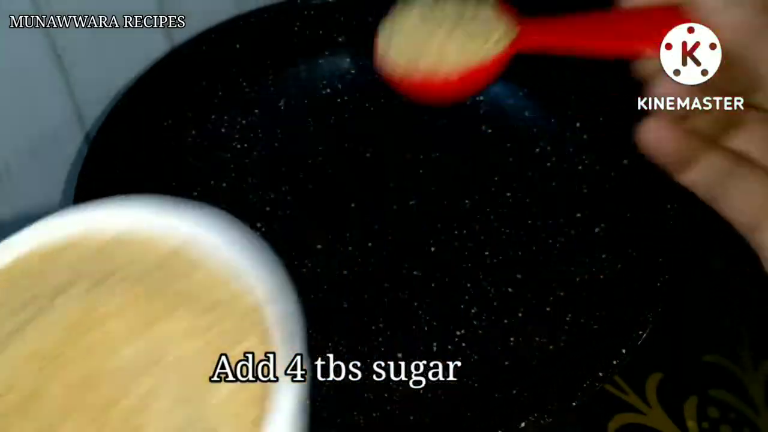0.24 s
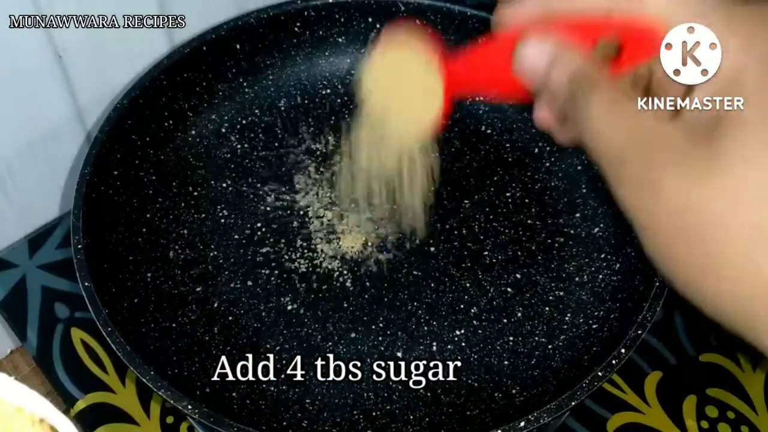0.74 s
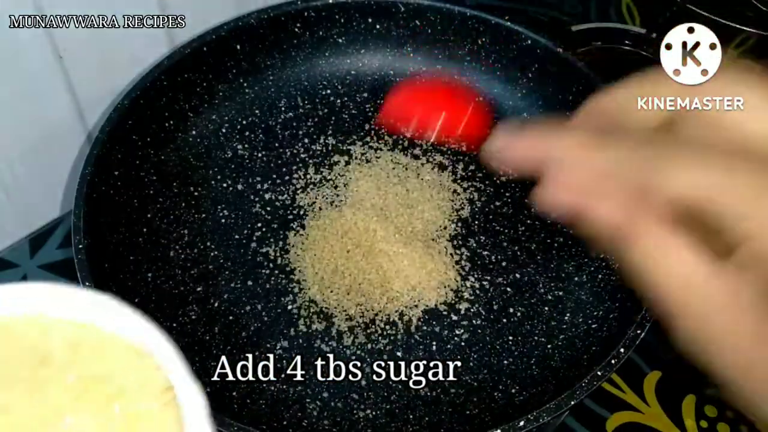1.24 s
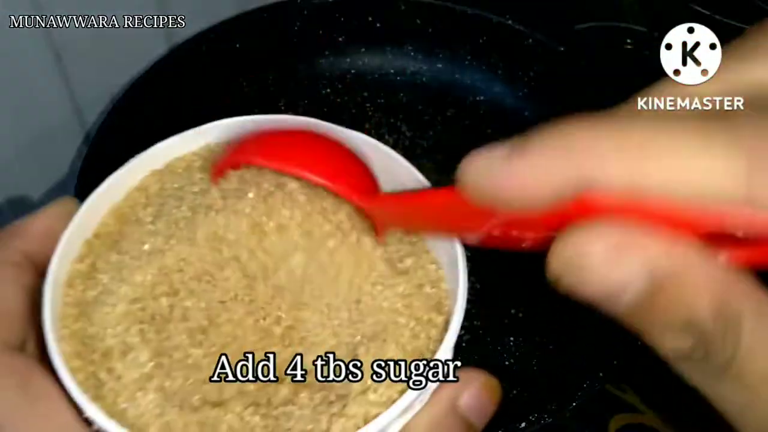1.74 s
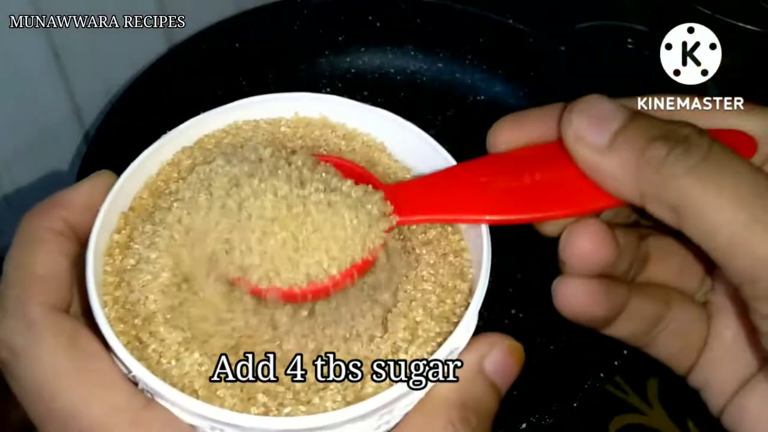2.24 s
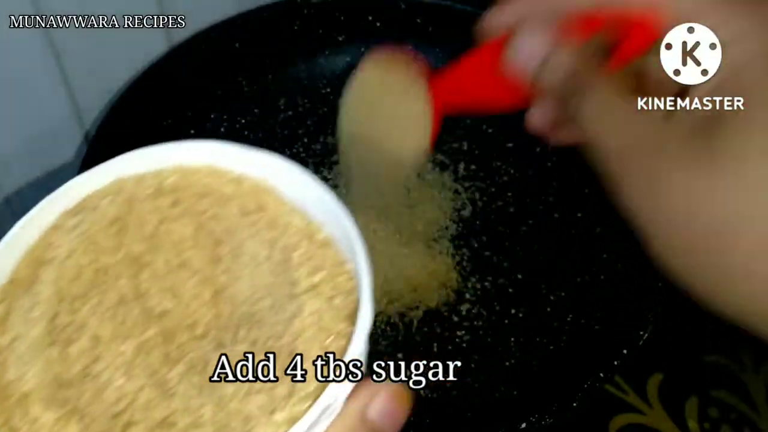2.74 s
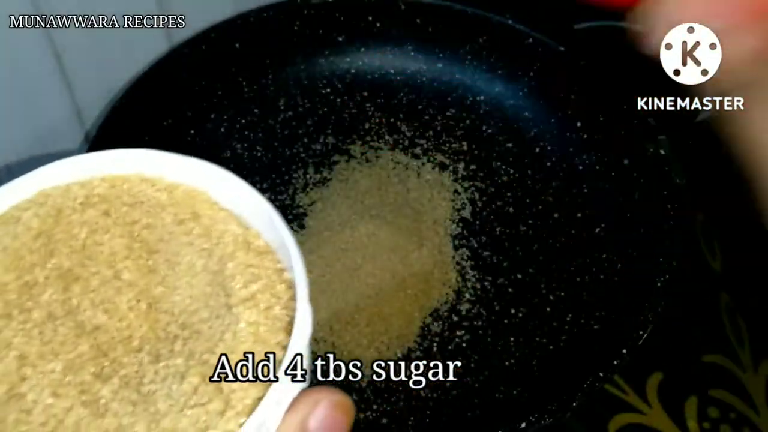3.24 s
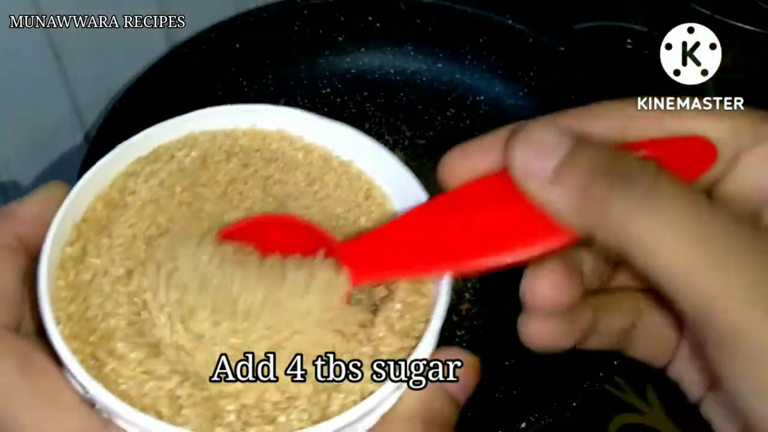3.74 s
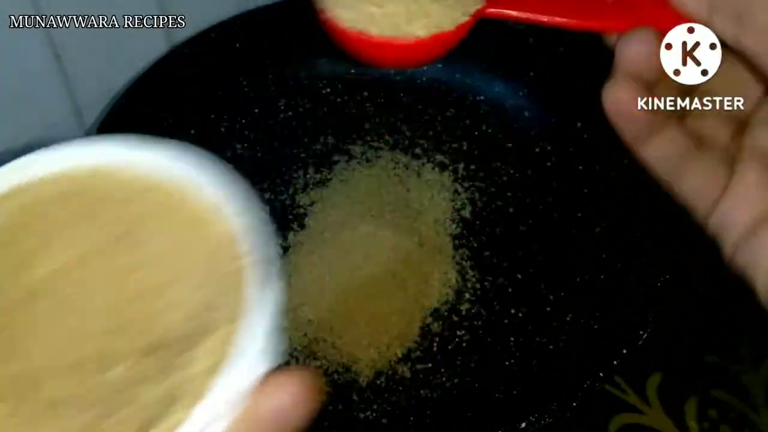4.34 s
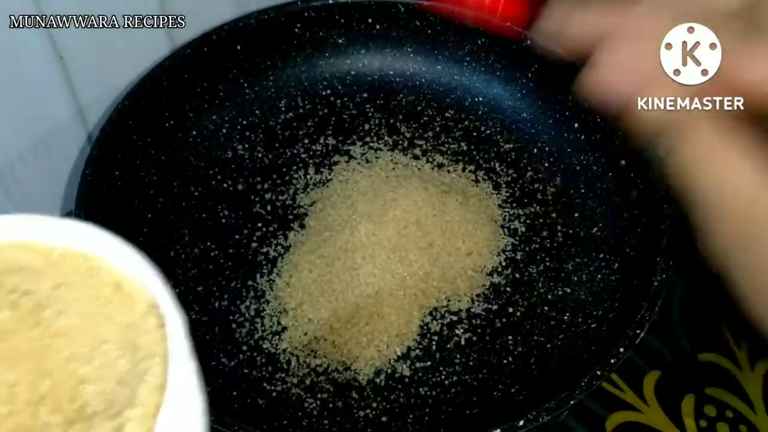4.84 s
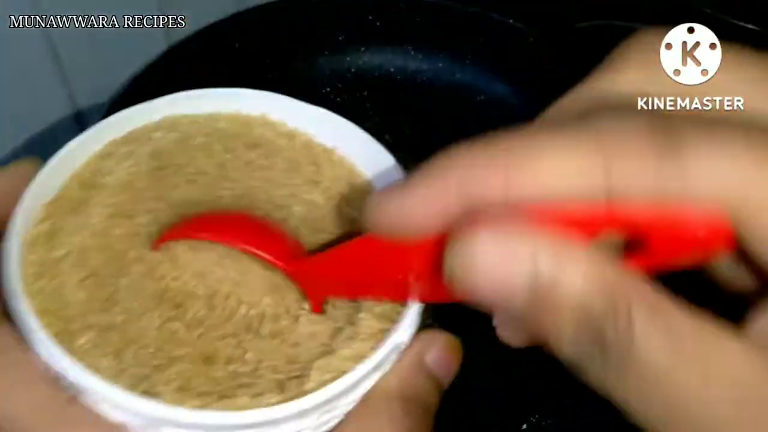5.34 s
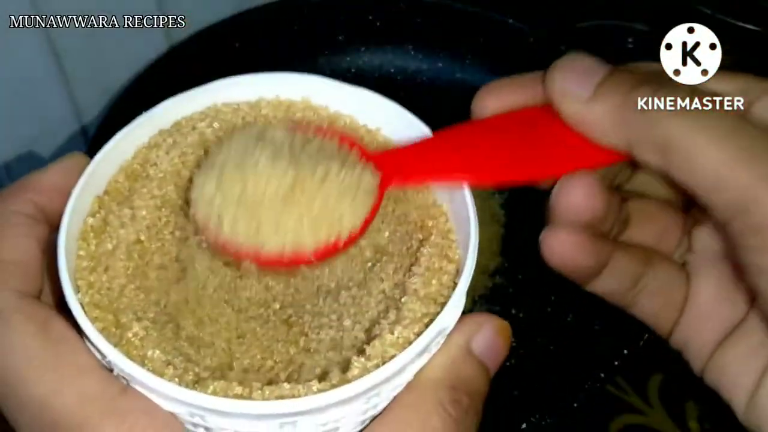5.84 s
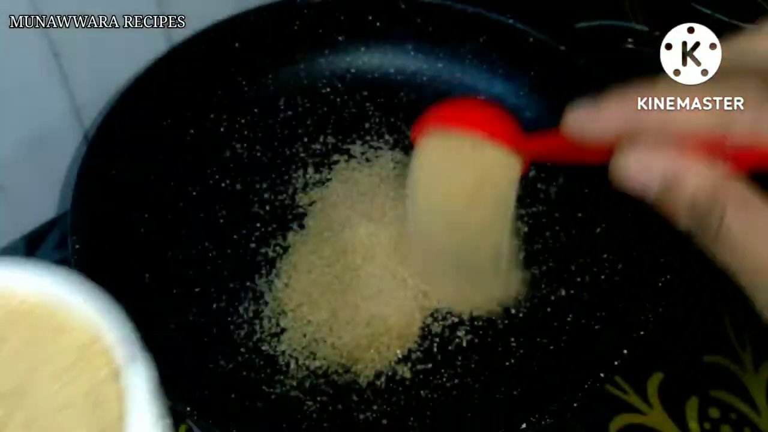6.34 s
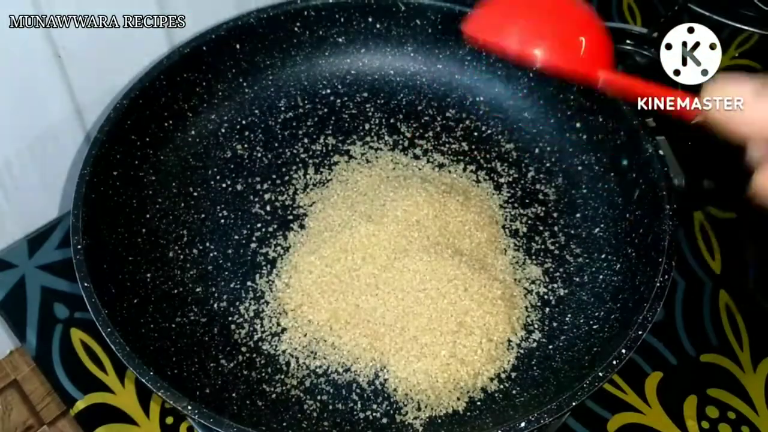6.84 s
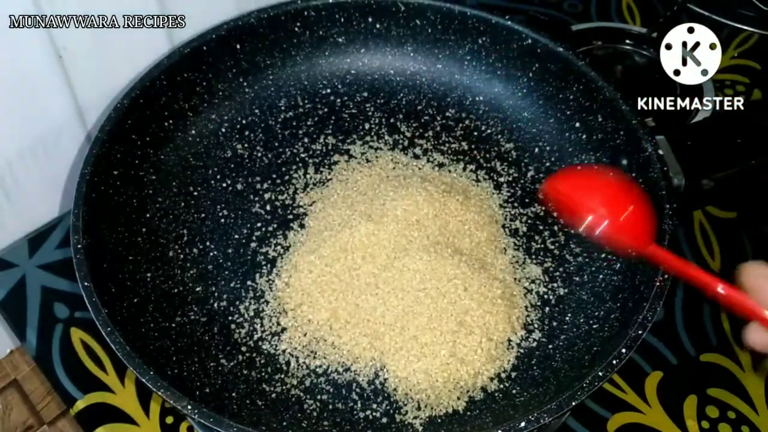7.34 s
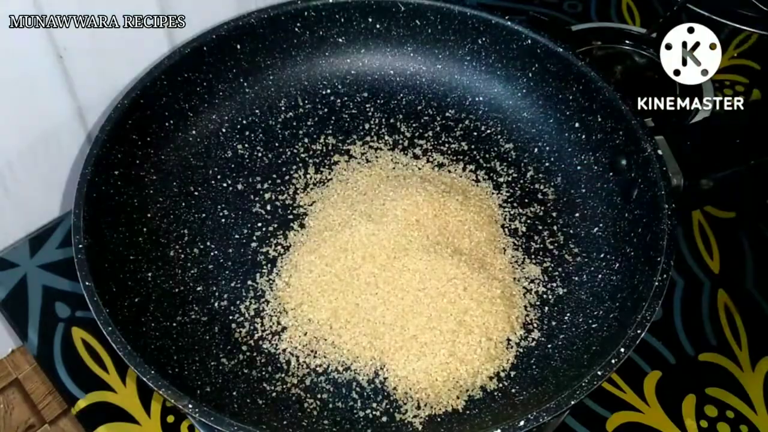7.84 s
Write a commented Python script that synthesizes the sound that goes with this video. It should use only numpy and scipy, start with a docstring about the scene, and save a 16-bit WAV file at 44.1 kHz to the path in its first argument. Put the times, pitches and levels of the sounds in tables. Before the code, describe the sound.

Close to a phone in a small hard-walled kitchen, dry crystals sprinkle onto a coated pan with a thin metallic shimmer, then patter on sugar. A spoon digs crunchily in a plastic bowl, with clumps falling in crisp bursts. Later come quiet gaps, isolated taps and short spills. Two loud, short-ringing knocks on the rim and a low rattle finish it, over distant rumble and drone.

```python
"""Coarse sugar is spooned from a plastic bowl into a coated metal pan in a small kitchen, close to a phone.
Over a low outside rumble the spoon rubs, then crystals (random impacts) patter on the ringing pan until a heap
damps it at about 0.9 s. The stream and its crumbling clumps (noise bursts) run on to about 3.3 s; up to 6.3 s
come taps, rubs and single slides. At 7.2 and 7.4 s the spoon raps the rim (noise cracks, ringing modes) and
the pan rocks on its stand; a faint tap, slide and rub end it."""
import sys
import numpy as np
from scipy import signal
from scipy.fft import rfft, irfft, next_fast_len
from scipy.io import wavfile
from scipy.ndimage import uniform_filter1d

SR = 44100
rng = np.random.default_rng(int(sys.argv[2]) if len(sys.argv) > 2 else 0)


def master_out(mix):
    """Clip the mix to full scale and print it as 16-bit PCM to the path in sys.argv[1]."""
    frames = np.transpose(np.atleast_2d(mix))
    ceiling = np.clip(frames, -1, 1)
    pcm = np.round(ceiling * 32767).astype(np.int16)
    wavfile.write(sys.argv[1], SR, pcm)


def nominal_scale(level):
    """Amplitude ratio for a level in decibels (scalar or array-like)."""
    x = np.asarray(level, float) / 20
    return 10 ** x


N = 356187

# sugar kept moving through the first pour and scoop: time_s, flow_db, dug_in_0_to_1
STREAM = [(0.0, -85.5, 1), (0.37, -88.5, 0.5), (0.46, -77.5, 0.5), (0.58, -63.5, 0.36), (0.76, -51.5, 0.3),
          (0.94, -62.5, 0.83), (1.22, -61, 0.82), (1.47, -60, 0.72), (1.69, -57, 0.77), (1.86, -61, 0.91),
          (2.05, -69, 0.88), (2.23, -71, 0.1), (2.34, -66.5, 0.37), (2.49, -74, 0.6), (2.77, -60.5, 0.38),
          (3.02, -68.5, 0.14), (3.2, -70.5, 0), (3.3, -67, 0.1), (3.36, -67.5, 0.75), (3.85, -80, 0.43),
          (4.4, -87.5, 0.6), (5.06, -89.5, 0.66), (6.2, -90.5, .8), (7.2, -100, 0.84)]
# single slides of a spoonful: start_s, peak_db, dug_in_0_to_1, rise_s, run_out_s
SLIDES = [(3.42, -53.5, 0.9, 0.1, 0.49), (4.498, -60, 0.02, 0.019, 0.35), (4.659, -78, 0.74, 0.018, 0.38),
          (5.248, -55.5, 0.9, 0.024, 0.45), (6.298, -56.5, 0, 0.018, 0.38), (8.0, -78, 0.15, .02, 0.33)]
RUN_OUT_POWER = 1.65  # over 1: a slide holds, then ends ever faster
# colour of crystal patter: freq_hz, level_db
PATTER_COLOUR = [(2500, -67.5), (4500, -8), (6000, -3), (8000, 3.5), (10000, -5), (12000, -21.5),
                 (14000, -47.5)]
# colour of fine grains: freq_hz, level_db
FINES_COLOUR = [(8000, -8.5), (11000, -8.5), (13000, -0.5), (15300, 1), (15800, -45.5)]
# colour of the spoon crunching through sugar: freq_hz, level_db
CRUNCH_COLOUR = [(1200, -27.5), (2000, -3.5), (3000, -2.5), (4500, -6.5), (6500, -22.5)]
# hollow colour of the cup: freq_hz, level_db
CUP_COLOUR = [(400, -28.5), (800, -15), (1100, -2.5), (1600, -5.5), (2500, -27)]
FINES_DB, CRUNCH_DB, CUP_DB = -8, -22, -29.5  # re the flow, spoon on the surface
CRUNCH_DUG_DB, CUP_DUG_DB = 20.5, 26  # gained when the spoon is dug in fully
GRAIN_PATCH_DB = 3

# modes of the thin pan base: freq_hz
BASE_HZ = [2169, 2455, 3413, 3957, 4425, 5001, 5900, 6013, 6681, 6977, 7154, 7660, 7784, 7935, 8312, 8597,
           8823, 9103, 9884, 10497, 11402, 12672, 13657, 14400]
# the same modes in order: width_hz, level_db
BASE_MODES = [(14, -1), (25, -14), (20, -11), (25, -14), (30, -13), (30, -10), (30, -9), (30, -8), (40, -7),
              (40, -5), (40, -4), (40, 0), (40, 0), (40, 0), (50, -6), (50, -7), (50, -3), (60, -9),
              (60, -11), (60, -14), (70, -13), (70, -15), (80, -18), (80, -16)]
BARE_DB, HEAP_S, HEAP_DB_PER_S = 3.5, 0.92, 145  # bare base re the flow; when and how fast the heap damps it

# clumps and single crystals landing: start_s, peak_db, centre_hz, first_tick_re_spray_db
CLUMPS = [(0.0825, -59.5, 8700, 13.5), (0.399, -42.5, 7100, 6.5), (0.4477, -47, 8150, 11),
          (0.478, -62, 7800, 12), (0.5109, -49, 8900, 11.5), (0.5688, -45, 8500, 8),
          (0.6085, -37.5, 8000, 3), (0.7594, -34, 7800, 5), (1.1892, -31.5, 7400, -5),
          (1.266, -28, 7140, -2), (1.334, -28, 7600, 3.5), (1.4178, -32, 4270, 4), (1.4658, -30.5, 4280, 4),
          (1.513, -30.5, 6840, 5.5), (1.5732, -21, 6000, -5), (1.5908, -16, 7240, -3),
          (1.769, -31.5, 7900, 5), (2.0712, -36, 8400, 2.5), (2.1276, -39, 9800, 2),
          (2.149, -50, 8200, -11), (2.2588, -30.5, 7350, -13), (2.346, -39, 8850, -1),
          (2.3562, -36, 8000, 4), (2.417, -38, 10100, 4), (2.44, -44.5, 9300, 6), (2.5277, -43.5, 7500, 10),
          (2.5454, -34, 7700, 1), (2.611, -43, 9000, 5), (2.6689, -30.5, 7900, 3.5),
          (2.735, -45.5, 7900, -1), (2.7877, -26.5, 9600, -2), (3.318, -37, 7100, 4.5),
          (4.513, -40, 9670, -1), (4.6683, -50, 7500, -4), (4.768, -63.5, 2500, 11),
          (5.756, -60.5, 2840, 7.5), (5.915, -46, 5300, -5), (6.144, -58, 9200, -11),
          (6.3116, -48, 7920, 4), (6.646, -66.5, 13200, -3), (6.766, -57.5, 10130, -2),
          (7.7208, -64, 7330, 0.5), (8.0024, -54, 8360, -4)]
CRUMBLE_T60_S = 0.11
CRUMBLE_OCTAVES, NARROWING_OCTAVES_PER_DB = 0.72, 0.1  # width at -40 dB; big clumps keep to a narrower band

# spoon on the rim: start_s, peak_db, tilt_db_per_octave, middle_modes_db
RAPS = [(7.2242, -12.5, -2.5, 14), (7.3889, -11, -1, -3)]
# the blow itself: freq_hz, level_db
CRACK_COLOUR = [(88, -48), (150, -12.5), (1210, -10.5), (1790, -1), (2550, -6.5), (3100, -14.5),
                (3490, -4.5), (4670, -8), (5050, -12.5), (5570, -6), (7620, -3.5), (14500, -18),
                (16000, -42.5)]
# rim modes ringing freely: freq_hz, free_t60_s
RIM_MODES = [(883, .1), (1780, .03), (2021, .1), (2229, .035), (2457, .04), (2880, .06), (3490, .035),
             (4110, .05), (4651, .075), (5190, .04), (5700, .05), (6400, .05), (6970, .05), (7400, .025),
             (8037, .03), (8995, .04)]
# how strongly a blow drives each rim mode: level_db
RIM_DRIVE_DB = [-11.5, 2, -29.5, -4, -10.5, -20.5, -10.5, -19.5, -11.5, -23.5, -9, -20.5, -9.5, 5, 3.5, -6]
RIM_T60_FACTOR = 0.74  # the spoon lingers and shortens the ringing
# the pan jolts on its stand: start_s, peak_db
JOLTS = [(7.223, -38.5), (7.392, -37), (7.462, -30.5)]
# modes of pan and stand: freq_hz, level_db, t60_s
STAND_MODES = [(85, -10, .15), (149, -1, .2), (200, -5, .08), (237, -8, .12), (294, -6, .1), (345, -9, .12),
               (460, -10, .06), (614, -16, .05)]

# spoon against the bowl: start_s, peak_db, hollow_knock_re_peak_db
TAPS = [(3.425, -27, -19.5), (3.867, -40, -12.5), (5.082, -20.5, -17), (6.174, -44, -53), (7.87, -49, -37)]
# short rubs of spoon and fingers, each about one resonance: start_s, length_s, centre_hz, level_db
RUBS = [(0.0, 0.027, 540, -60), (0.153, 0.082, 5500, -71.5), (0.202, 0.058, 908, -73.5),
        (0.206, 0.027, 2630, -79.5), (0.598, 0.32, 585, -74), (1.357, 0.012, 3170, -52),
        (1.722, 0.055, 2170, -60), (2.531, 0.13, 1060, -73.5), (2.559, 0.16, 343, -61.5),
        (3.336, 0.075, 1256, -66), (3.485, .17, 1130, -65), (4.657, 0.12, 1290, -76),
        (4.67, 0.086, 521, -73), (5.254, 0.14, 1104, -57), (4.762, 0.05, 1290, -75.5),
        (5.618, .05, 1235, -84), (5.718, 0.15, 1770, -84), (5.729, 0.11, 2170, -77.5),
        (5.906, 0.094, 1900, -68.5), (6.32, 0.19, 470, -80.5), (7.979, 0.06, 325, -73)]
RUB_WIDTH = 0.2  # resonance width over centre
# the spoon is tipped empty: start_s, length_s, level_db
TIPS = [(2.817, 0.21, -74), (4.494, .12, -74.5), (6.302, 0.1, -74)]
# what hums as it drains: centre_hz, width_hz, level_db
EMPTYING = [(1600, 240, -4), (2460, 250, 0), (3400, 260, -4), (5570, 310, -1)]

# kitchen decay: freq_hz, t60_s
KITCHEN_T60 = [(150, 0.51), (1000, 0.33), (4000, .28), (12000, 0.27)]
# sound from outside: time_s, rumble_db, drone_db
OUTSIDE = [(0.0, -66.5, -72.5), (0.38, -64.5, -82.5), (0.88, -63, -70), (1.47, -63, -79.5),
           (1.85, -60.5, -60.5), (2.31, -63.5, -69.5), (2.81, -64.5, -63), (3.44, -61, -75),
           (3.88, -65, -82.5), (5.75, -66, -91.5), (7.15, -67.5, -99.5), (7.85, -70.5, -99.5),
           (8.077, -63.5, -87)]
# rumble colour: freq_hz, level_db
RUMBLE_COLOUR = [(12, -62), (20, -24.5), (37, -16.5), (56, -17.5), (86, -6.5), (166, -8.5), (193, -12),
                 (242, -21.5), (400, -40), (520, -80), (880, -120)]
# drone colour: freq_hz, level_db
DRONE_COLOUR = [(120, -26), (200, -1), (276, -0.5), (329, 6.5), (436, -5.5), (508, -1.5), (774, -34.5),
                (900, -40.5), (1170, -31.5), (1980, -120)]
# hiss colour: freq_hz, level_db
HISS_COLOUR = [(180, -32), (300, -16.5), (379, -9), (494, -9.5), (546, -17), (614, -14), (1340, -21),
               (1640, -19.5), (2440, -24), (16000, -27.5)]
HISS_DB = -85
# microphone response: freq_hz, gain_db
MIC_RESPONSE = [(25, -9.5), (60, -0.5), (15400, 5.5), (15800, -10), (16600, -28), (16800, -90.5)]


def unit(x):
    """Scale to rms 1."""
    return x / np.sqrt(np.mean(x ** 2) + 1e-20)


def add(out, start_s, sound):
    """Mix a sound into out at its start time."""
    out[round(start_s * SR):][:len(sound)] += sound


def curves(rows):
    """One value per sample for each column after the time."""
    time_s, *columns = np.transpose(rows)
    return [np.interp(np.arange(N) / SR, time_s, column) for column in columns]


def along(points, hz):
    """Interpolate (Hz, value) points on a log frequency axis."""
    point_hz, values = np.transpose(points)
    return np.interp(np.log(hz + 1), np.log(point_hz + 1), values)


def filtered(x, response):
    """x times a complex response of frequency."""
    size = next_fast_len(len(x) + 8192)
    return irfft(rfft(x, size) * response(np.fft.rfftfreq(size, 1 / SR)), size)[:len(x)]


def causal(gain):
    """Minimum-phase response with this gain, by folding the cepstrum."""
    cepstrum = irfft(np.log(gain + 1e-6))
    half = len(cepstrum) // 2
    folded = np.r_[cepstrum[0], 2 * cepstrum[1:half], np.zeros(len(cepstrum) - half)]
    return np.exp(rfft(folded))


def coloured(x, spectrum):
    """x through a causal (Hz, dB) colour, rms 1."""
    return unit(filtered(x, lambda hz: causal(nominal_scale(along(spectrum, hz)))))


def resonance(hz, centre_hz, width_hz):
    """Band-pass response of one damped resonance, 1 at its centre."""
    damping = 1j * hz * width_hz
    return damping / (centre_hz ** 2 - hz ** 2 + damping)


def patchy(x, depth_db):
    """Random streaks of gain, narrow in frequency and long in time."""
    bins = signal.stft(x, nperseg=512)[2]
    field = uniform_filter1d(rng.standard_normal(bins.shape), size=3, axis=0)
    field = uniform_filter1d(field, size=12, axis=1)
    return signal.istft(bins * nominal_scale(depth_db * unit(field)), nperseg=512)[1][:N]


def crystals(rate_hz, spread_db, count=N):
    """Impacts at random moments, of scattered but bounded size, rms 1."""
    hit = rng.random(count) < rate_hz / SR
    size = np.minimum(rng.exponential(size=count), 3)
    return unit(hit * nominal_scale(spread_db * size) * rng.standard_normal(count))


def ring(modes, t):
    """Exponentially damped sine modes with a soft start."""
    tones = sum(nominal_scale(db - 60 * t / t60_s) * np.sin(2 * np.pi * hz * t) for hz, db, t60_s in modes)
    return tones * (1 - np.exp(-t / 0.0014))


def sugar():
    """Crystals stream over heap, bowl, spoon and bare pan; digging adds crunch and fills the cup."""
    level, dug = flow()
    parts = [(PATTER_COLOUR, 0), (FINES_COLOUR, FINES_DB),
             (CRUNCH_COLOUR, CRUNCH_DB + CRUNCH_DUG_DB * dug), (CUP_COLOUR, CUP_DB + CUP_DUG_DB * dug)]
    stream = np.zeros(N)
    for colour, share_db in parts:
        grains = patchy(crystals(20000, spread_db=3.5), GRAIN_PATCH_DB)
        stream += nominal_scale(share_db) * coloured(grains, colour)
    heap_age_s = np.maximum(np.arange(N) / SR - HEAP_S, 0)
    bare = nominal_scale(BARE_DB - HEAP_DB_PER_S * heap_age_s)
    return level * stream + pan_base(level * bare * crystals(4300, spread_db=9.5))


def flow():
    """Level of the moving sugar and spoon depth: the steady stream plus slides that swell and die."""
    stream_db, dug = curves(STREAM)
    total, t = nominal_scale(stream_db), np.arange(N) / SR
    weighted = total * dug
    for start_s, db, depth, rise_s, run_out_s in SLIDES:
        age_s = np.maximum(t - start_s, 0)
        swell = 1 - np.exp(-(age_s / rise_s) ** 2)
        slide = swell * nominal_scale(db - 60 * (age_s / run_out_s) ** RUN_OUT_POWER)
        total = total + slide
        weighted = weighted + slide * depth
    return total, np.clip(weighted / total, 0, 1)


def pan_base(force):
    """The thin base's modes rung by striking crystals; noise of rms 1 rings at rms 1."""
    def modes(hz):
        total = sum(nominal_scale(db) * resonance(hz, centre_hz, width_hz)
                    for centre_hz, (width_hz, db) in zip(BASE_HZ, BASE_MODES))
        return total / np.sqrt(np.mean(abs(total) ** 2))
    return filtered(force, modes)


def clumps():
    """Each landing is a first tick, then the clump crumbles as a gritty spray in its own band."""
    out, force, t = np.zeros(N + SR), np.zeros(N + SR), np.arange(SR // 4) / SR
    for start_s, db, centre_hz, tick_db in CLUMPS:
        octaves = np.clip(CRUMBLE_OCTAVES - NARROWING_OCTAVES_PER_DB * (db + 40), 0.3, 1)
        grit = crystals(6000, spread_db=4, count=len(t))
        spray = (1 - np.exp(-t / 0.0059)) * nominal_scale(-60 * t / CRUMBLE_T60_S) * grit
        tick = nominal_scale(tick_db - 60 * t / 0.0068) * rng.standard_normal(len(t))
        blow = 0.31 * nominal_scale(db) * (tick + spray)

        def band(hz):
            hump = nominal_scale(-6 * (np.log2((hz + 1) / centre_hz) / octaves) ** 2)
            return causal(hump + 0.2 * (hz > 2500))
        add(out, start_s, filtered(blow, band))
        if start_s < HEAP_S:  # only the bare base rings
            add(force, start_s, nominal_scale(4.5) * blow)
    return out[:N] + pan_base(force[:N])


def raps():
    """The spoon cracks on the rim, which rings briefly, its middle modes by where the blow lands."""
    out, t = np.zeros(N + SR), np.arange(SR // 2) / SR
    mode_hz, free_t60_s = np.transpose(RIM_MODES)
    middle = (mode_hz > 2000) & (mode_hz < 6500)
    for start_s, db, tilt_db, middle_db in RAPS:
        decay = nominal_scale(-60 * t / 0.013) + 0.15 * nominal_scale(-60 * t / 0.08)
        crack = rng.standard_normal(len(t)) * decay * (1 - np.exp(-t / 0.00062))

        def colour(hz):
            tilt = tilt_db * np.log2(np.clip(hz, 500, 9000) / 3000)
            return causal(nominal_scale(along(CRACK_COLOUR, hz) + tilt))
        modes = zip(mode_hz, RIM_DRIVE_DB + middle_db * middle, RIM_T60_FACTOR * free_t60_s)
        add(out, start_s, nominal_scale(db) * (1.39 * filtered(crack, colour) + 0.15 * ring(modes, t)))
    return out[:N]


def rocking():
    """The pan jolts on its stand and sets off low damped modes."""
    out, t = np.zeros(N + SR), np.arange(SR // 2) / SR
    for start_s, db in JOLTS:
        add(out, start_s, nominal_scale(db) * ring(STAND_MODES, t))
    return out[:N]


def taps():
    """Hard plastic taps: decaying noise about 4.5 kHz with the cup's hollow knock."""
    out, t = np.zeros(N + SR), np.arange(SR // 4) / SR
    for start_s, db, knock_db in TAPS:
        blow = rng.standard_normal(len(t)) * (nominal_scale(-60 * t / 0.013) + 0.15 * nominal_scale(-60 * t / 0.064))

        def colour(hz):
            hard = nominal_scale(-4 * np.log2((hz + 1) / 4500) ** 2)
            hollow = nominal_scale(knock_db + 24.5 + along(CUP_COLOUR, hz))
            return causal(hard + hollow)
        add(out, start_s, 0.27 * nominal_scale(db) * filtered(blow, colour))
    return out[:N]


def rubs():
    """Soft rubs and the hums of the emptying spoon: resonant noise that swells and fades."""
    out = np.zeros(N + SR)
    events = [(s, length_s, hz, RUB_WIDTH * hz, db) for s, length_s, hz, db in RUBS]
    events += [(s, length_s, hz, width_hz, db + mode_db)
               for s, length_s, db in TIPS for hz, width_hz, mode_db in EMPTYING]
    for start_s, length_s, centre_hz, width_hz, db in events:
        u = np.arange(SR // 2) / SR / length_s
        # two resonances in series
        rub = filtered(rng.standard_normal(len(u)), lambda hz: resonance(hz, centre_hz, width_hz) ** 2)
        add(out, start_s, nominal_scale(db) * unit(rub) * np.minimum(6 * u, 1) * np.exp(-1.5 * u ** 2))
    return out[:N]


def kitchen(x):
    """Tiled walls answer; each frequency dies at its own speed, with a new noise tail every 0.2 s."""
    out, step = np.zeros(N + SR), SR // 5
    for start in range(0, N, step):
        hz, t, bins = signal.stft(rng.standard_normal(SR // 2), SR, nperseg=256)
        decay = nominal_scale(-60 * t / along(KITCHEN_T60, hz)[:, None])
        tail = signal.istft(bins * decay, SR, nperseg=256)[1]
        wet = signal.fftconvolve(x[start:start + step], tail / np.linalg.norm(tail))
        out[start + 300:][:len(wet)] += wet  # 300 samples of delay
    return out[:N]


def outside():
    """Low rumble and a passing drone through the walls, over a faint hiss: coloured, patchy noise."""
    def rush(spectrum, depth_db):
        return coloured(patchy(rng.standard_normal(N), depth_db), spectrum)
    rumble_db, drone_db = curves(OUTSIDE)
    rumble = nominal_scale(rumble_db) * rush(RUMBLE_COLOUR, 2.9)
    drone = nominal_scale(drone_db) * rush(DRONE_COLOUR, 4.6)
    hiss = nominal_scale(HISS_DB) * rush(HISS_COLOUR, 1.4)
    return rumble + drone + hiss


def scene():
    """Hits get a near wall's echo and the room; the stream's level already holds them."""
    hits = clumps() + raps() + rocking() + taps() + rubs()
    wall = np.roll(hits, round(0.0078 * SR))
    room = nominal_scale(-12.5) * wall + nominal_scale(-5.5) * kitchen(hits)
    return (sugar() + hits + room + outside())[None]


def suppress(x, over_db, floor_db, above_hz):
    """The phone's noise suppressor: bins near the steady background drop, leaving flickering streaks."""
    hz, _, bins = signal.stft(x, SR, nperseg=512, noverlap=384)
    power = uniform_filter1d(abs(bins) ** 2, size=12, axis=-1)
    steady = np.quantile(power, q=0.1, axis=-1, keepdims=True)
    gain = np.maximum(1 - nominal_scale(over_db) * steady / (power + 1e-20), nominal_scale(floor_db))
    gain[:, hz < above_hz] = 1
    return signal.istft(bins * gain, SR, nperseg=512, noverlap=384)[1][:, :N]


def top_cut(x):
    """Nothing passes above the cut-off."""
    return signal.sosfilt(signal.butter(12, 16630, fs=SR, output="sos"), x)


def record(dry):
    """Microphone colour, then noise suppression."""
    heard = filtered(dry[0], lambda hz: causal(nominal_scale(along(MIC_RESPONSE, hz))))[None]
    mix = suppress(heard, over_db=0.5, floor_db=-8, above_hz=180)
    return top_cut(mix)


dry = scene()
out = record(dry)
master_out(out)
```